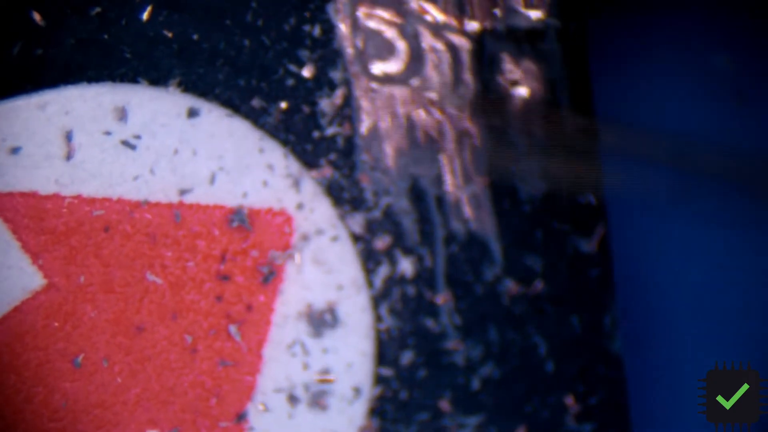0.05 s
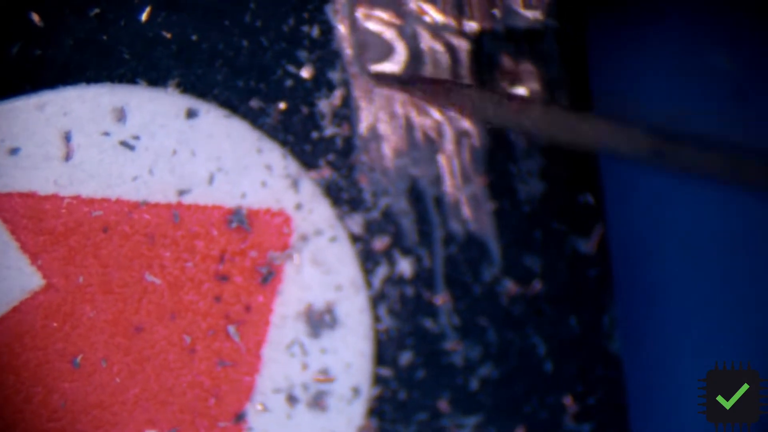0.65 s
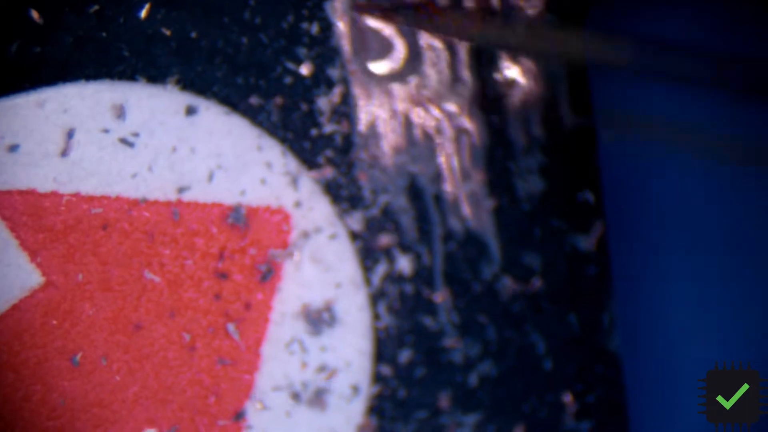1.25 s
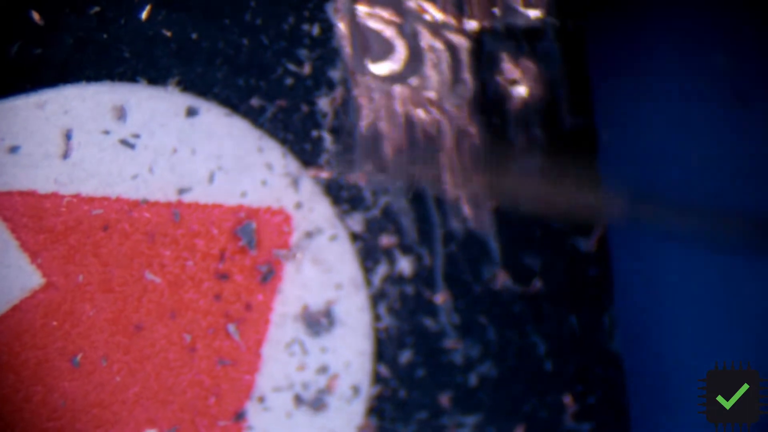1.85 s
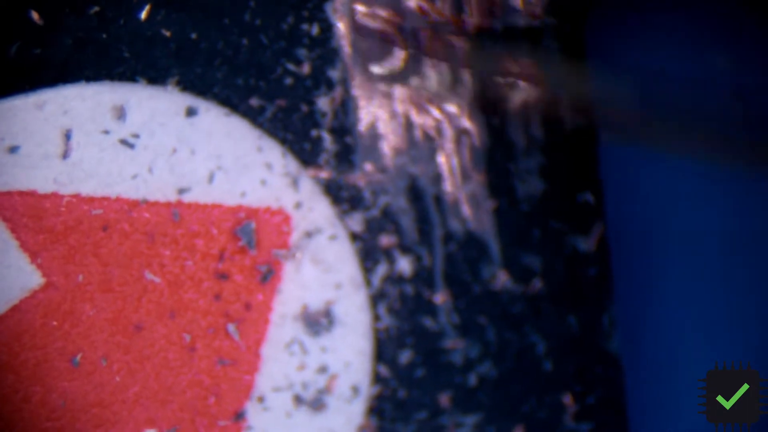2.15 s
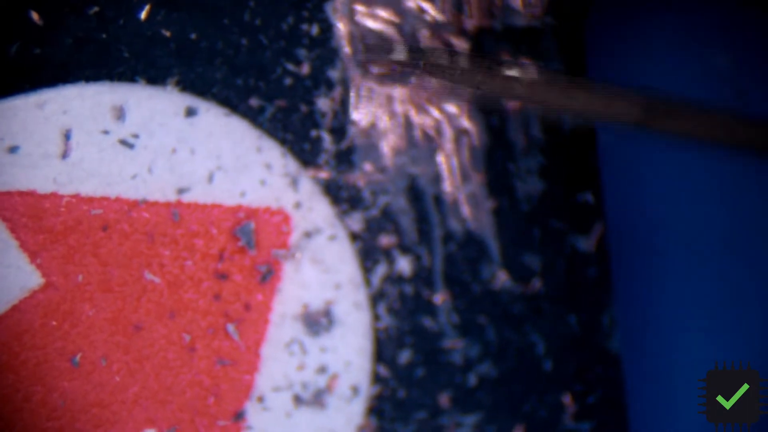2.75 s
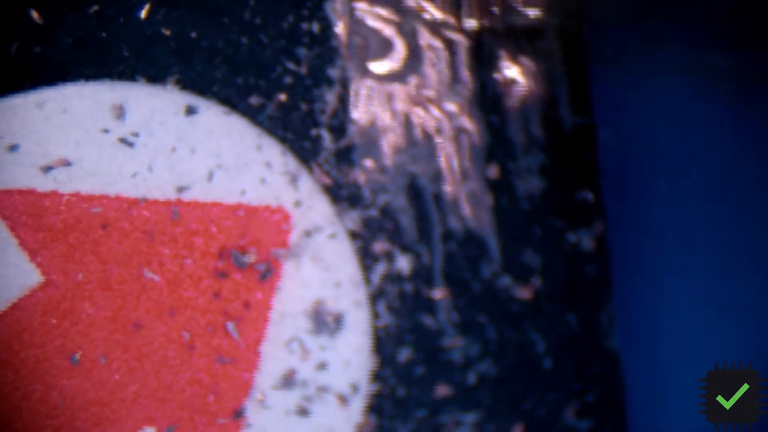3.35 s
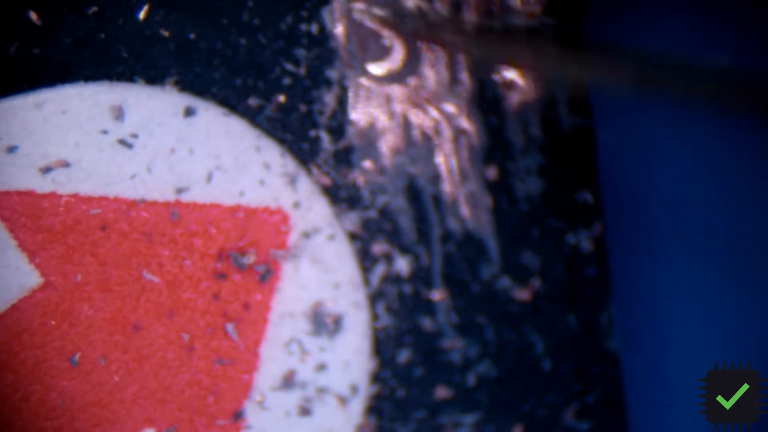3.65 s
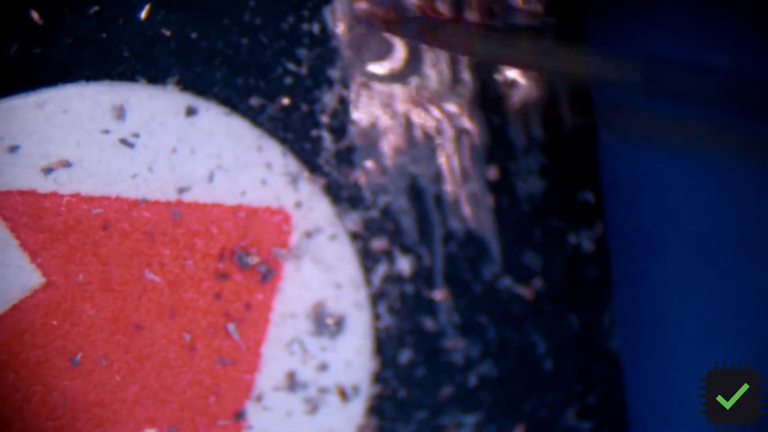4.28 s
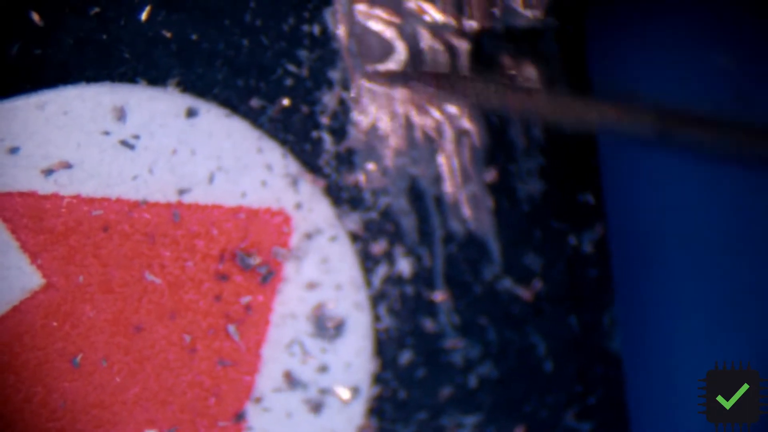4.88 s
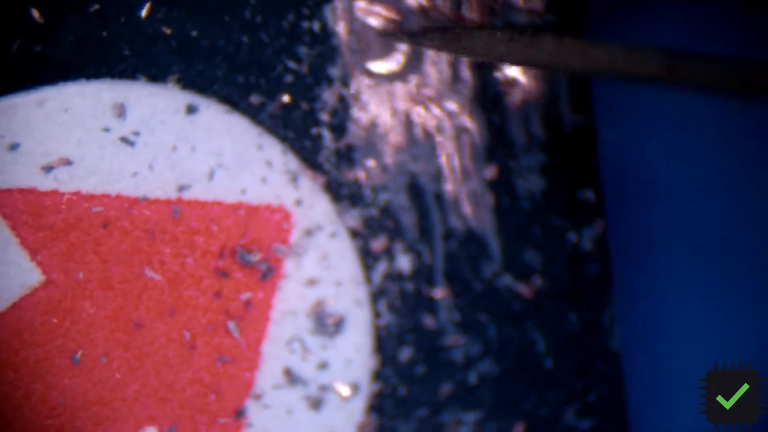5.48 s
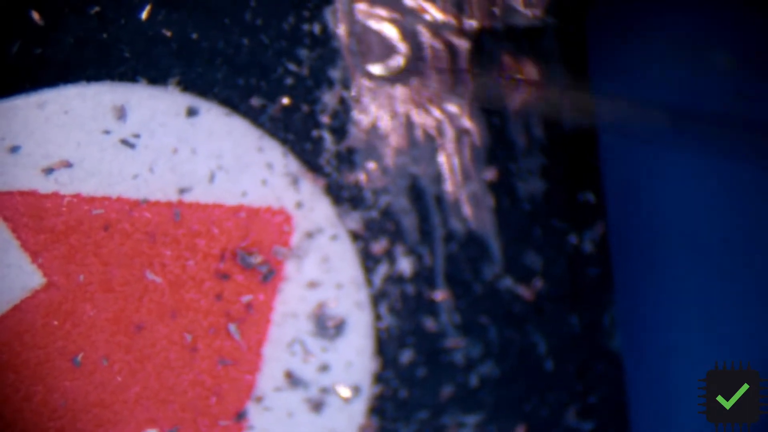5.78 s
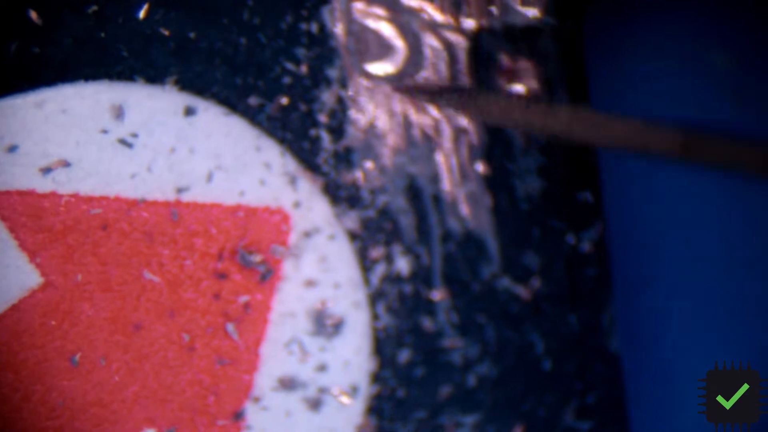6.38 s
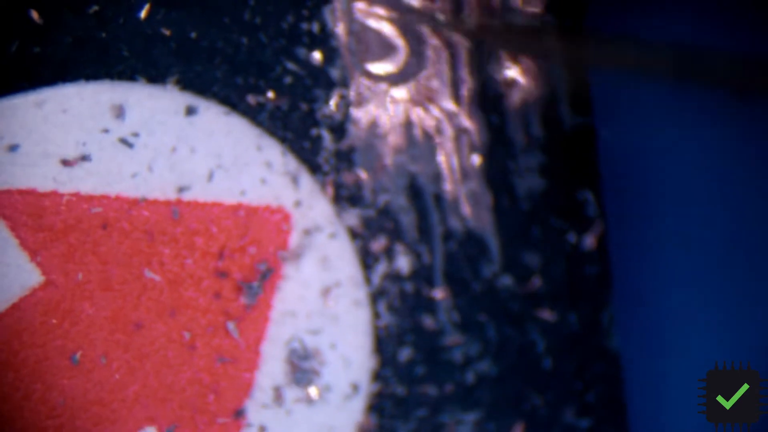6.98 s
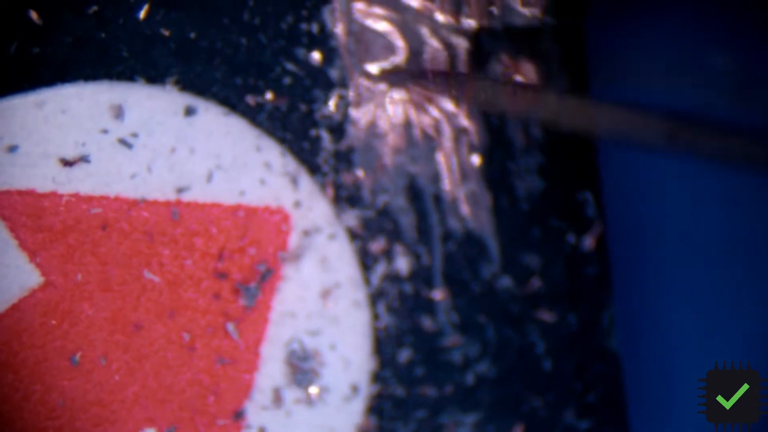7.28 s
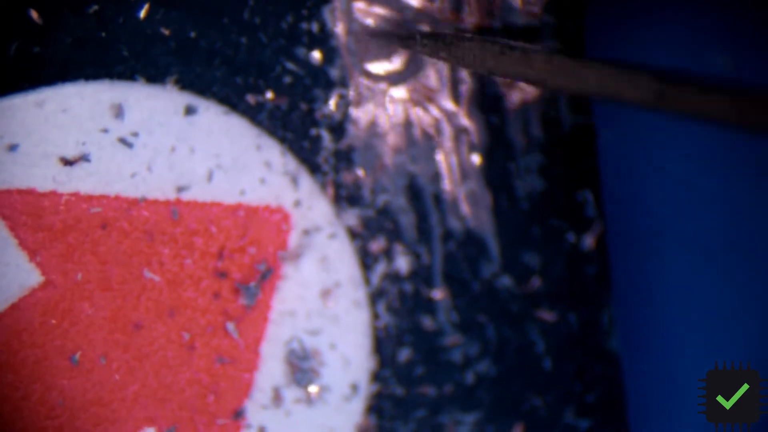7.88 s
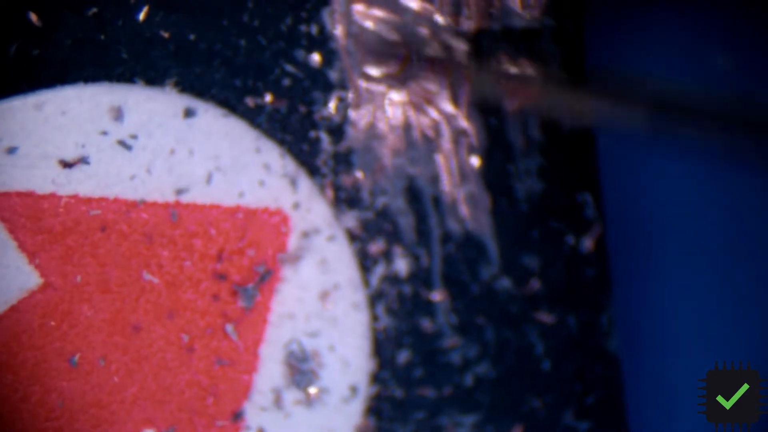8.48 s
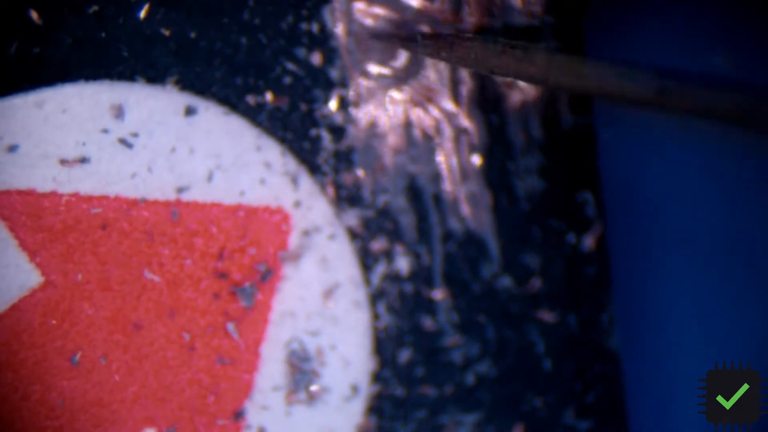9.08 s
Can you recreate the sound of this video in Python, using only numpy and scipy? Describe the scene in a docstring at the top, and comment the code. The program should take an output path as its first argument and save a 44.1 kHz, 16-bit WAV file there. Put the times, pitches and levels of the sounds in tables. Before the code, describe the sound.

Dry, scratchy clicks come in uneven clusters as a steel blade digs at the coating on a circuit board. Most are small ticks and brief chatters, separated by short gaps and soft scrapes. A few harder snaps, strongest past the middle, ring the steel briefly and knock the workbench dully. It is all heard up close in a small, dry room over a faint hiss.

```python
"""Dry snaps and scratches, close up: a small steel blade scrapes the coating off a circuit board.
In each stroke the tip glides, catches, chatters and snaps free. Its stick-slip force rings the
steel in bright ticks and the board in hollow clacks, and the hardest slips thump the bench.
The room is small and dry, with a faint steady hiss underneath."""
import sys
import numpy as np
from scipy import signal
from scipy.fft import rfft, irfft
from scipy.io import wavfile

SR = 44100
rng = np.random.default_rng(int(sys.argv[2]) if len(sys.argv) > 2 else 0)


def dump_mix(stems):
    """Bounce the given channels to the path in sys.argv[1] as a 16-bit WAV at rate SR."""
    frames = np.atleast_2d(stems).T  # one column per channel
    limited = np.clip(frames, -1, 1)  # hard clip at full scale
    pcm = np.round(limited * 32767).astype(np.int16)
    wavfile.write(sys.argv[1], SR, pcm)


N = 407484
LEAD_S = .012
TIME = np.arange(SR // 4) / SR - LEAD_S  # the life of one slip in seconds, from just before it
REFLECTIONS = rng.standard_normal(len(TIME))  # the room's own pattern of echoes

# Resonances of the blade's shank. Each row: pitch in Hz, width in Hz, relative level in dB.
SHANK_MODES = [(4317, 660, -2), (4835, 230, -1.5), (5560, 640, 0), (7016, 490, -6.5)]
# Resonances of its thin edge. Each row: pitch in Hz, width in Hz, relative level in dB.
EDGE_MODES = [(9070, 1300, 6), (10820, 1300, 7.5), (12500, 3600, 0), (15400, 3900, -18)]


def gain_of(db):
    """Decibels to a factor."""
    return 10 ** (np.asarray(db) / 20)


def sized(x, db):
    """The sound scaled to an energy in dB."""
    return gain_of(db) * x / (np.linalg.norm(x) + 1e-12)


def add(mix, start_s, sound):
    """Lays a sound into the mix, trimming any overhang."""
    at = round(start_s * SR)
    sound = sound[max(-at, 0):]
    part = mix[max(at, 0):][:len(sound)]
    part += sound[:len(part)]


def through(x, response):
    """A signal passed through an impulse response."""
    return signal.fftconvolve(x, response)[:len(TIME)]


def room(force, wet_db, t60, echo_db, build_s=0.0028, echo_s=.0106):
    """The direct sound, one echo from a near surface, and a diffuse tail fed by the force's power."""
    age = TIME + LEAD_S
    lingering = np.exp(-np.log(1e6) * age / t60) * (1 - np.exp(-age / build_s))
    envelope = np.sqrt(abs(through(force ** 2, lingering)))
    # the walls stay put, so each slip meets mostly the same reflections
    tail = envelope * (REFLECTIONS + .5 * rng.standard_normal(len(TIME)))
    heard = sized(force, 0) + sized(tail, wet_db)
    add(heard, echo_s, sized(force, echo_db))
    return heard


def ring(force, modes, db, tilt_db=0, skirt_db=-17, top_hz=SR, detune=0.017):
    """The force coloured by a body's resonances, tilted by tilt_db per octave, at an energy of db."""
    hz = np.fft.rfftfreq(2048, 1 / SR)[:, None] + 1
    centre, width, mode_db = np.transpose(modes)
    centre = centre * (1 + detune * rng.standard_normal(len(centre)))  # grip and pressure vary
    share = gain_of(mode_db + tilt_db * np.log2(centre / centre[0])) ** 2
    peaks = 1 / (1 + ((hz ** 2 - centre ** 2) / (hz * width)) ** 2)
    power = (peaks ** 2 + gain_of(skirt_db) ** 2 * peaks) @ share  # steep peaks on weak, wide skirts
    power = power / (1 + (hz[:, 0] / top_hz) ** 24)
    # minimum phase: the body rings only after it is struck
    log_gain = np.log(power + 1e-9) / 2
    mirrored = np.append(log_gain, log_gain[-2:0:-1])
    response = np.fft.ifft(np.exp(np.conj(signal.hilbert(mirrored)))).real
    return sized(through(force, response), db)


def slips(length_s, grit_db=-14, creep=0.57, crumble_s=0.0007, drag_s=0.0041):
    """Force at the tip: uneven stick-slip jerks, each a tiny crumbling burst, in a rasp of grit."""
    gaps_s = rng.uniform(0.002448, 0.003723, 12)
    starts = np.append(0, np.cumsum(gaps_s))
    strengths = gain_of(-rng.standard_normal(len(starts)))
    # the grit creeps in over a share of the length and drags on just after
    before, after = np.maximum(-TIME, 0), np.maximum(TIME - length_s, 0)
    envelope = gain_of(grit_db) * np.exp(-before / (creep * length_s + 1 / SR) - after / drag_s)
    for start, strength in zip(starts[starts <= length_s], strengths):
        age = np.maximum(TIME - start, 0) / crumble_s
        envelope = envelope + strength * age * np.exp(1 - np.minimum(age, 50))
    return envelope * rng.standard_normal(len(TIME))


def blade(force, shank_db, edge_db, length_s=0):
    """The steel rings for a few milliseconds, heard mostly directly; short snaps reach higher."""
    shank = ring(room(force, wet_db=-7, t60=0.19, echo_db=-17.5), SHANK_MODES, shank_db, skirt_db=-9)
    top_hz = 13400 * (1 + .5 * np.exp(-length_s / 0.0045))
    edge_drive = room(force, wet_db=-10, t60=.2, echo_db=-22)
    return shank + ring(edge_drive, EDGE_MODES, edge_db, skirt_db=-26, top_hz=top_hz)


def board(force, clack_db, tilt_db, main_db, detune_hz=0):
    """The flat board clacks, rings and bends, heard more by way of the room than the blade is."""
    # The board's clack, its main ringing pair and its slow, hollow bending.
    # Each row: pitch in Hz, width in Hz, relative level in dB.
    clack_modes = [(704, 67, -1), (880, 90, -3.5), (982, 250, 4.5), (1361, 200, 0), (2027, 400, -2),
                   (2510, 84, 3), (2802, 840, -6.5)]
    main_modes = [(1535, 130, -0.58), (1654, 170, -0.078)]
    tock_modes = [(857, 75, 9)]
    clack_drive = room(force, wet_db=4, t60=.17, echo_db=-1)
    clack = ring(clack_drive, clack_modes, clack_db, tilt_db, skirt_db=-15.5)
    main_drive = room(force, wet_db=0, t60=0.18, echo_db=-10.5)
    tock_db = clack_db - 9 - tilt_db  # the duller the push, the more it bends the whole board
    tock = ring(room(force, wet_db=-3, t60=.14, echo_db=-11), tock_modes, tock_db)
    pair = [(hz + detune_hz, width, db) for hz, width, db in main_modes]
    return clack + tock + ring(main_drive, pair, main_db, skirt_db=-13)


def thump(db):
    """A single jerk knocks a dull note out of the bench top."""
    # The bench's resonances. Each row: pitch in Hz, width in Hz, relative level in dB.
    bench_modes = [(191, 120, -11), (300, 109, 3), (511, 200, 0)]
    return ring(room(slips(0), wet_db=1.5, t60=0.21, echo_db=-7.5), bench_modes, db, skirt_db=-20.5)


def dig(start_s, length_s, force_db, tilt_db, edge_db, snap_s=.001, zing_above_db=-11):
    """One dig rings the blade: a short, blunt snap leans on the bench, a long chatter on the board."""
    # The board's main ring changes as the work moves over it.
    # Each row: time in seconds, level against the clack in dB, detuning in Hz.
    ring_drift = [(0.7, -7, 54), (0.93, 3, -110), (1.4, 3, -33), (3.25, 4, 3), (4.6, -5, 14), (6.2, -1, -8),
                  (6.7, -11, -71.5), (7.2, 5.5, 49), (8.2, -8.5, 28), (9.0, -4.5, 20.5)]
    times, lift_db, detune_hz = np.transpose(ring_drift)
    doublings = np.log2(max(length_s / snap_s, 1))
    clack_db = 0.9 * force_db - 7.5 + 2.58 * doublings
    main_db = clack_db + np.interp(start_s, times, lift_db)
    thump_db = force_db - 12.5 - 1.6 * doublings - .8 * max(tilt_db, 0)
    force = slips(length_s, creep=.22 + .09 * doublings)
    clack = board(force, clack_db, tilt_db, main_db, np.interp(start_s, times, detune_hz))
    steel = blade(force, force_db, force_db + edge_db, length_s)
    steel += (force_db > zing_above_db) * zing(force_db - 23)
    return steel + clack + thump(thump_db)


def digs(chatter_s=.0055, approach_s=.022):
    """The tip digs in and slips through the coating, gliding into the longer chatters."""
    # Each row is one dig: start in seconds, chatter length in seconds, force in dB,
    # sharpness of the push in dB per octave, level of the edge against the shank in dB.
    catches = [(0.002, 0.0018, -19.5, 11, 2), (0.538, 0.008, -24, 6.5, -7), (0.699, 0.006, -27, -11.5, -6),
               (0.934, 0.01, -19, -4, -5.5), (1.169, 0.016, -15, 2.5, -5.5),
               (1.407, 0.0065, -12.5, -2, -9.5), (1.421, 0.0018, -8, 7, -9.5),
               (2.105, 0.0076, -22.5, -1.5, -5.5), (2.381, 0.011, -33.5, -4, 3),
               (2.404, 0.00067, -21.5, -0.5, -2), (2.962, 0.0028, -4.5, 3.5, -7.5),
               (3.257, 0.0024, -21.5, 1, -0.5), (3.265, 0.0058, -20, 6, -5.5),
               (3.296, 0.00097, -19.5, 12, 0), (3.382, 0.00075, -21, 2, -0.5), (3.817, 0.0056, -21, 4, -9),
               (3.825, 0.0083, -18.5, 4, -6.5), (4.538, 0.0017, -6.5, 20.5, -1.5),
               (4.767, 0.008, -22.5, -0.5, -18), (4.786, 0.0024, -16.5, 2, -3.5),
               (5.53, 0.0047, -18.5, 8, 0), (5.689, 0.00045, -20.5, -5.5, 6), (5.935, 0.0034, -24, 14, -13),
               (5.989, 0.0024, -22.5, 0, 5.5), (6.141, 0.0015, -9, 13, 1.5),
               (6.168, 0.0059, -16.5, 6.5, -6.5), (6.244, 0.0009, -19, 1, -3.5),
               (6.399, 0.0013, 2.5, 9, -7), (6.465, 0.0018, -20, 6, -15), (6.659, 0.0017, -3, 1.5, -6.5),
               (6.873, 0.0017, 2, 5.5, -3.5), (7.084, 0.0024, -20, 22, -3), (7.092, 0.0016, -15, 6, -1.5),
               (7.13, 0.0017, -20.5, 6.5, -7), (7.319, 0.0062, -32.5, 6, 3.5),
               (8.044, 0.0078, -22.5, -2, -8), (8.301, 0.01, -23, -2, -8), (8.549, 0.0017, -19.5, -5, -3),
               (8.642, 0.003, -19.5, 9, 1.5), (8.782, 0.012, -19, 2.5, -8), (9.01, 0.0016, -22.5, 21, -11)]
    out = np.zeros(N)
    for start_s, length_s, force_db, tilt_db, edge_db in catches:
        add(out, start_s - LEAD_S, dig(start_s, length_s, force_db, tilt_db, edge_db))
        if length_s > chatter_s:
            add(out, start_s - approach_s - LEAD_S, glide(approach_s, force_db - 27, skew=1.9))
    return out


def hiss(rms_db=-68):
    """A bed of steady room noise with a few broad resonances."""
    # The room tone's contour. Each row: frequency in Hz, relative level in dB.
    contour = [(20, -14.5), (45, -7), (84, -28.5), (120, -6), (185, 1.5), (250, -1), (540, -2), (850, -8.5),
               (1100, -3), (1900, -13.5), (3300, -17), (9500, -26.5), (11500, -28.5), (16000, -32.5)]
    # Its resonances. Each row: centre in Hz, width in Hz, lift in dB.
    peaks = [(2220, 330, 10), (2770, 190, 11), (3830, 450, 9.7), (4830, 310, 7.9)]
    hz = np.fft.rfftfreq(N, 1 / SR)
    contour_hz, contour_db = np.transpose(contour)
    floor_db = np.interp(np.log(hz + 1), np.log(contour_hz), contour_db)
    lift_db = sum(db / (1 + (2 * (hz - centre) / width) ** 2) for centre, width, db in peaks)
    noise = irfft(rfft(rng.standard_normal(N)) * gain_of(floor_db + lift_db), N)
    return gain_of(rms_db) * noise / noise.std()


def glide(length_s, db, skew=0.37, ridge_db=7.5, grain_db=4):
    """The sliding tip whispers in the steel's resonances, swelling over each ridge in the coating."""
    ridges = signal.resample(rng.standard_normal(60), len(TIME))
    grains = signal.resample(rng.standard_normal(600), len(TIME))
    progress = np.clip(TIME / length_s, 0, 1) ** skew  # a skew under 1 peaks early, over 1 late
    contact = np.sqrt(abs(np.sin(np.pi * progress)))
    force = contact * gain_of(ridge_db * ridges + grain_db * grains) * rng.standard_normal(len(TIME))
    drive = room(force, wet_db=-18, t60=0.15, echo_db=-30.5)
    edge = ring(drive, EDGE_MODES[1:3], db, tilt_db=26, top_hz=13700, detune=.025)
    return edge + ring(drive, SHANK_MODES, db - 8)


def ticks(approach_s=.022):
    """Small flakes break away after a brief glide: the blade ticks, the board barely stirs."""
    # Each row is one flake: start in seconds, force in dB, level of the edge against the shank in dB.
    flakes = [(0.177, -28, 1.5), (0.219, -17, -3.5), (0.342, -25, -5), (0.399, -27, -7), (0.442, -23.5, 0),
              (0.795, -32, -8), (1.459, -18, -6.5), (1.75, -22, -6), (1.78, -26.5, 2), (2.188, -24.5, -2),
              (3.351, -26.5, -1), (3.36, -28, -8), (3.407, -26, -10), (4.427, -33.5, -8),
              (4.636, -20, -7.5), (5.137, -24, -3.5), (5.954, -23.5, -11.5), (6.685, -16, 6),
              (6.93, -20, -5), (7.181, -24.5, -3.5), (7.556, -30, -3), (8.172, -33.5, -3.5),
              (8.877, -32.5, -7), (9.231, -28, -13)]
    out = np.zeros(N)
    for start_s, force_db, edge_db in flakes:
        force = slips(0.0017, grit_db=-2.5, creep=0.44)
        stir = board(force, force_db - 12, tilt_db=8, main_db=force_db - 14)
        add(out, start_s - LEAD_S, blade(force, force_db, force_db + edge_db) + stir)
        add(out, start_s - approach_s - LEAD_S, glide(approach_s, force_db - 22, skew=1.8))
    return out


def return_strokes(length_s=0.079):
    """The tip slides lightly back over the coating between digs."""
    # Each row is one stroke: start in seconds, energy of the edge's whisper in dB.
    strokes = [(0.783, -37.5), (1.017, -42), (1.272, -44), (1.955, -47), (2.18, -24.5), (3.62, -41.5),
               (4.074, -43.5), (4.317, -41), (7.912, -33.5), (8.146, -33.5), (8.417, -36), (8.873, -35),
               (9.101, -42.5)]
    out = np.zeros(N)
    for start_s, db in strokes:
        add(out, start_s - LEAD_S, glide(length_s, db))
    return out


def zing(db, t60=.3):
    """A thin, high ring of the steel that outlasts a hard snap."""
    # The steel's lingering resonance. One row: pitch in Hz, width in Hz, relative level in dB.
    zing_mode = [(9110, 730, 2)]
    dying = (TIME > 0) * gain_of(-60 * TIME / t60)
    return ring(dying * rng.standard_normal(len(TIME)), zing_mode, db, skirt_db=-30, detune=.004)


def bumps():
    """The board shifts and knocks softly on the bench."""
    # Each row is one knock: start in seconds, energy in dB.
    knocks = [(2.412, -31), (3.56, -36), (4.442, -32.5)]
    out = np.zeros(N)
    for start_s, db in knocks:
        add(out, start_s - LEAD_S, thump(db))
    return out


def scene():
    """All the scraping over the room tone, in mono."""
    return (digs() + ticks() + return_strokes() + bumps() + hiss())[None]


def record(dry, top_hz=16300):
    """A steep low-pass takes off the very top."""
    lowpass = signal.firwin(255, top_hz, window=("kaiser", 8), fs=SR)
    return signal.oaconvolve(dry, lowpass[None], "same")


dry = scene()
out = record(dry)
dump_mix(out)
```